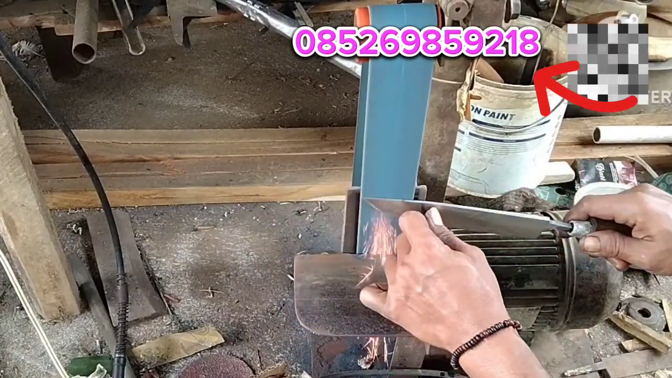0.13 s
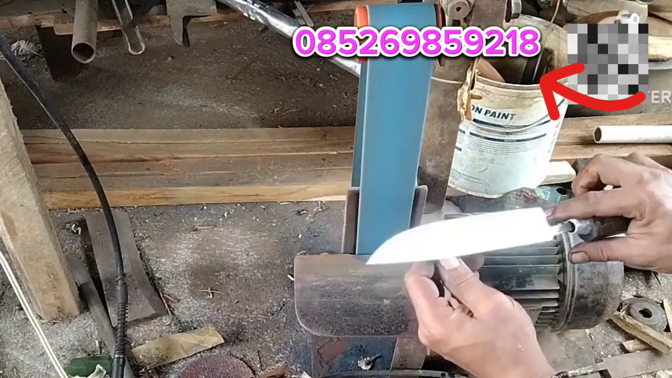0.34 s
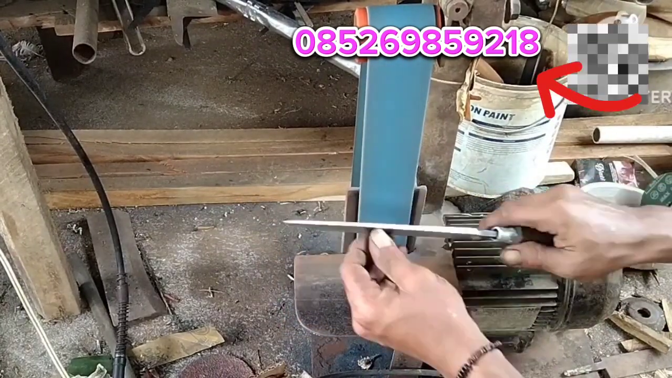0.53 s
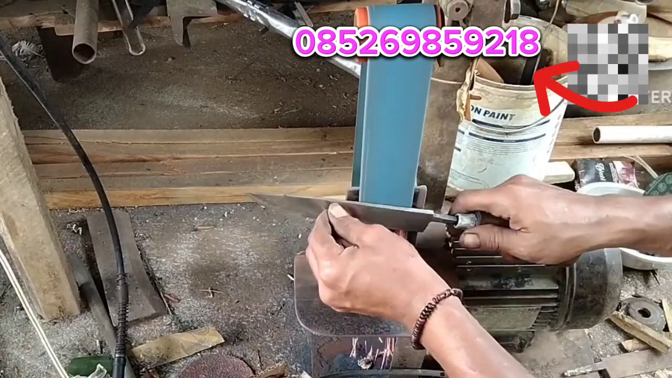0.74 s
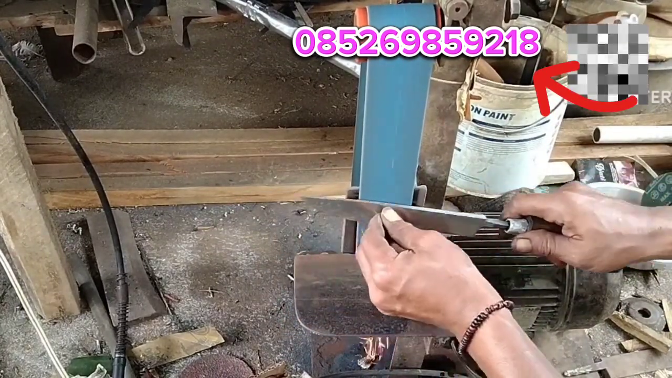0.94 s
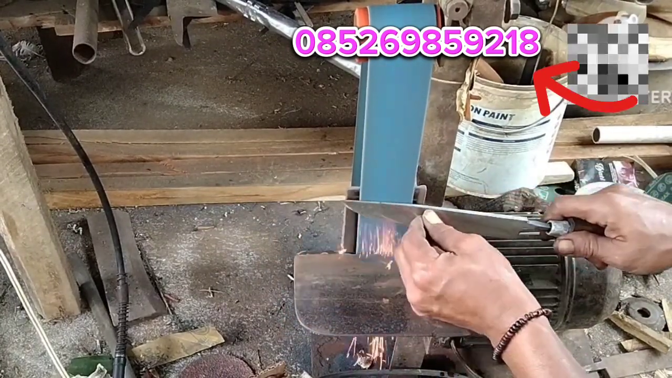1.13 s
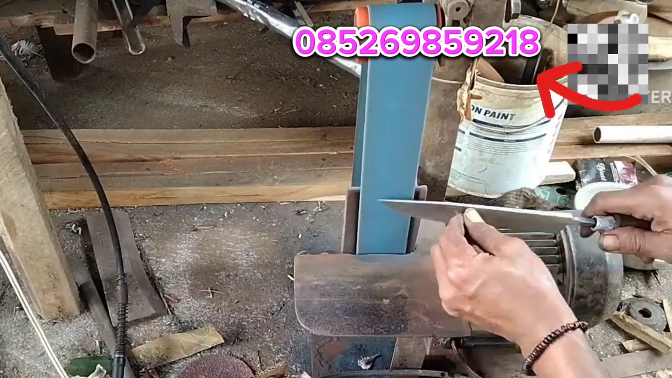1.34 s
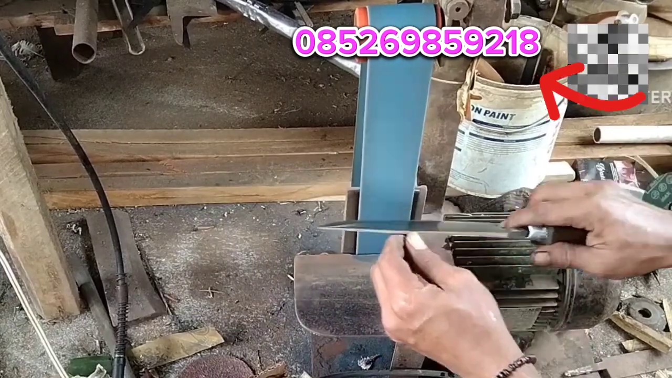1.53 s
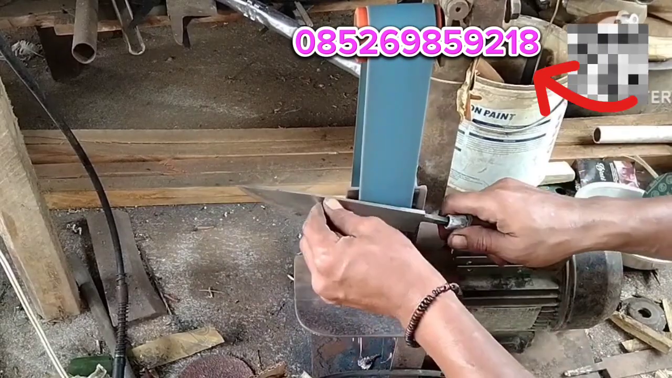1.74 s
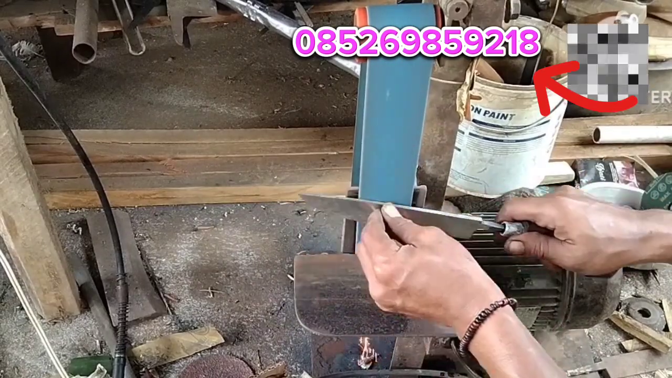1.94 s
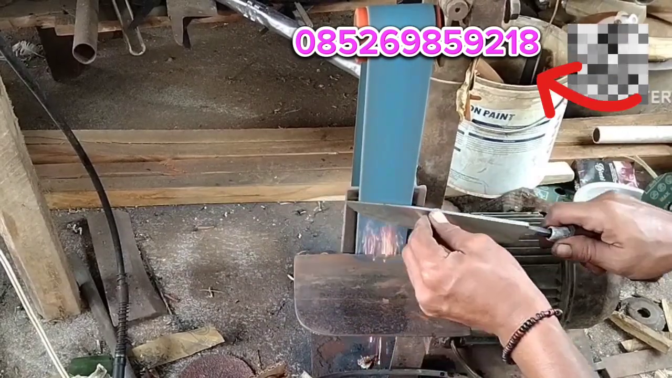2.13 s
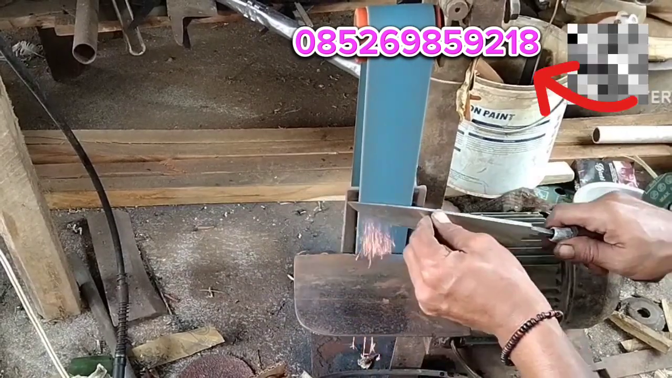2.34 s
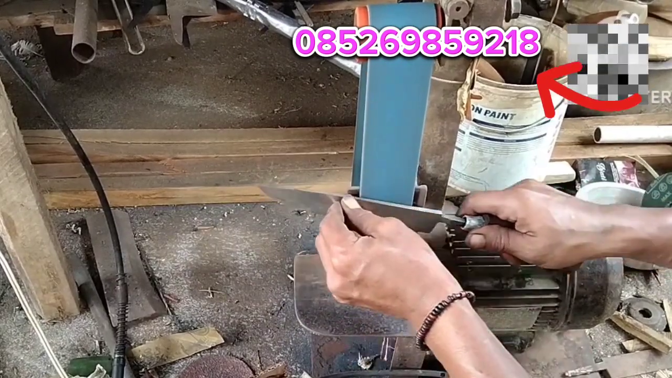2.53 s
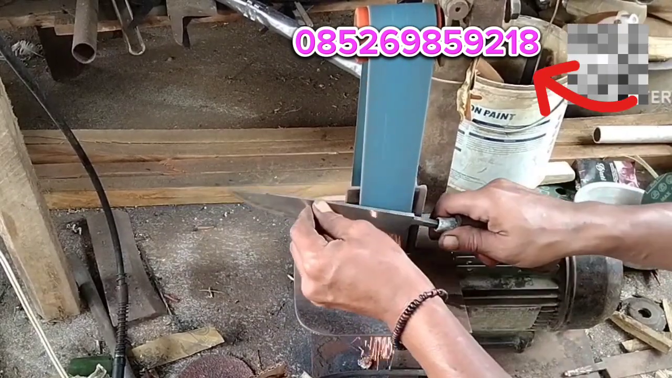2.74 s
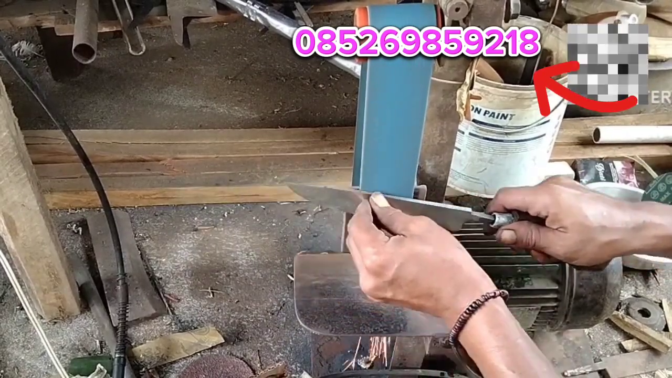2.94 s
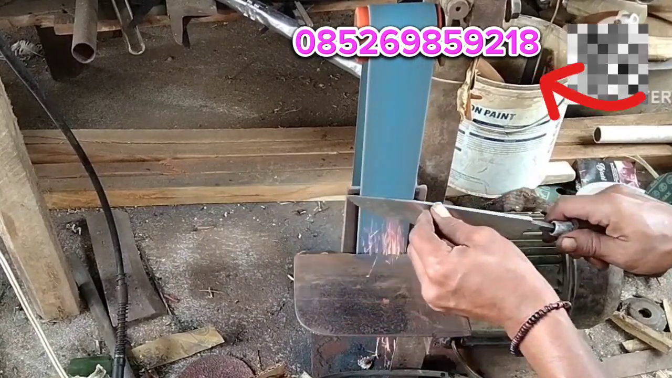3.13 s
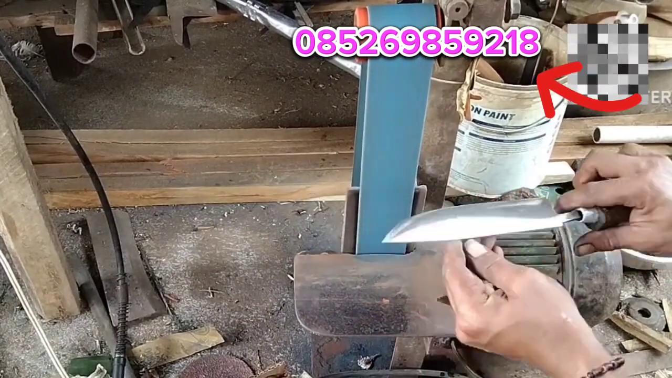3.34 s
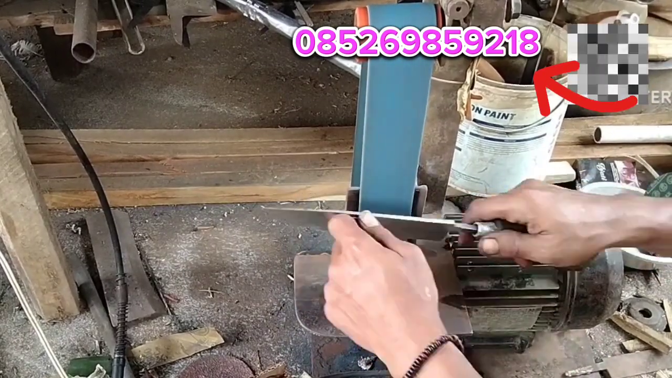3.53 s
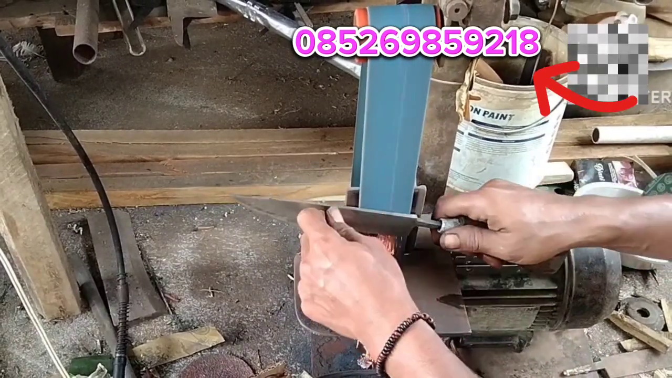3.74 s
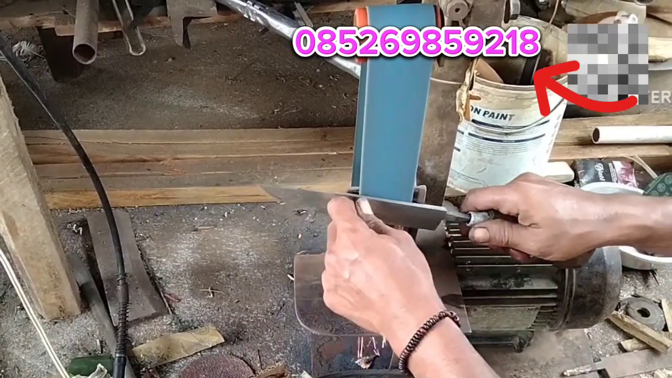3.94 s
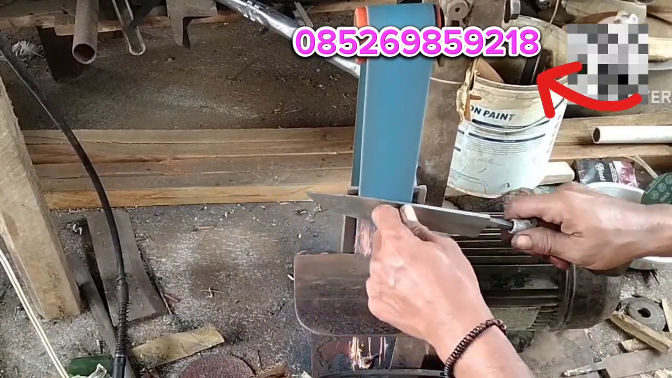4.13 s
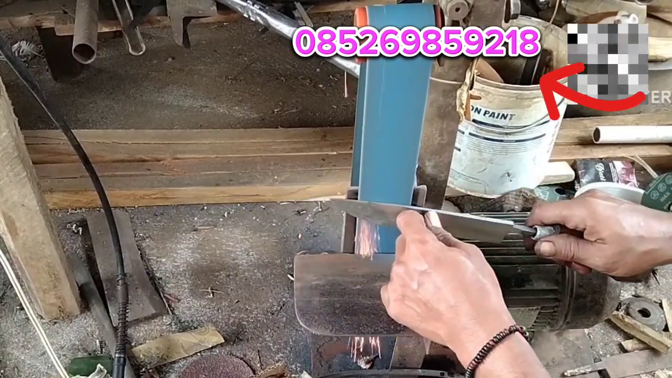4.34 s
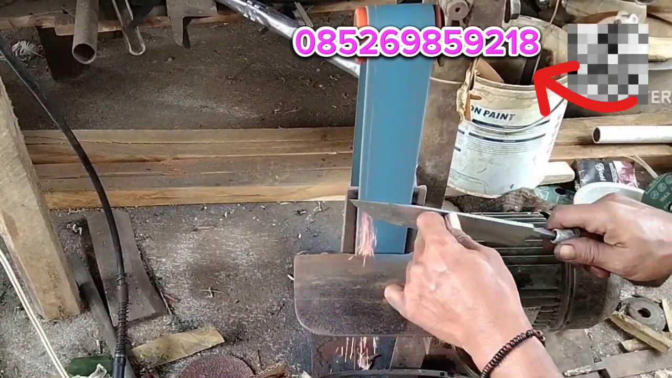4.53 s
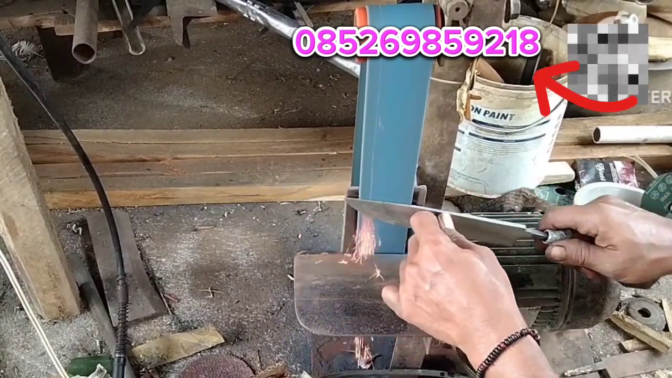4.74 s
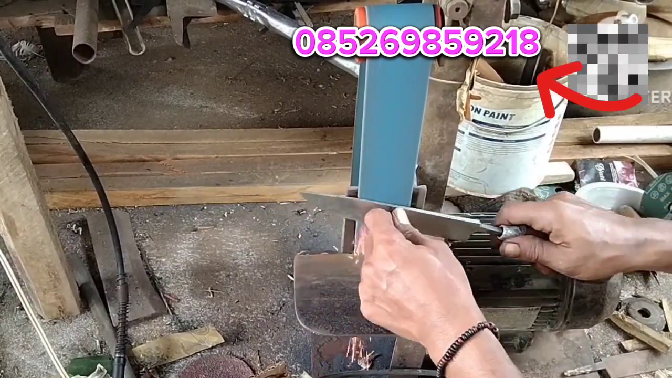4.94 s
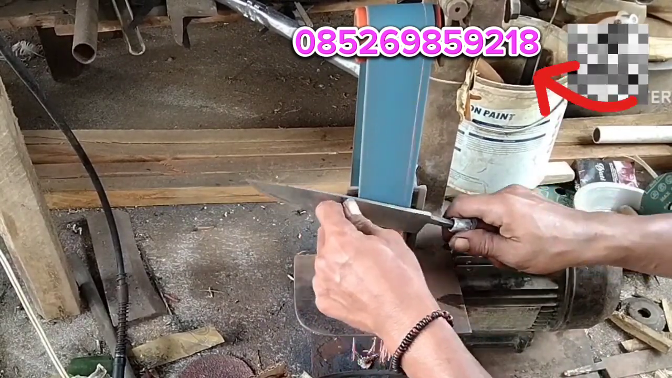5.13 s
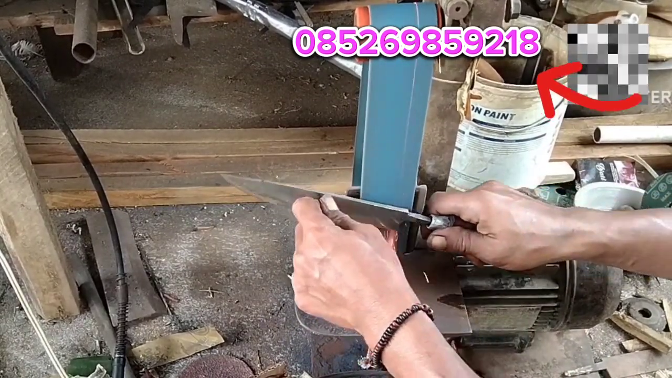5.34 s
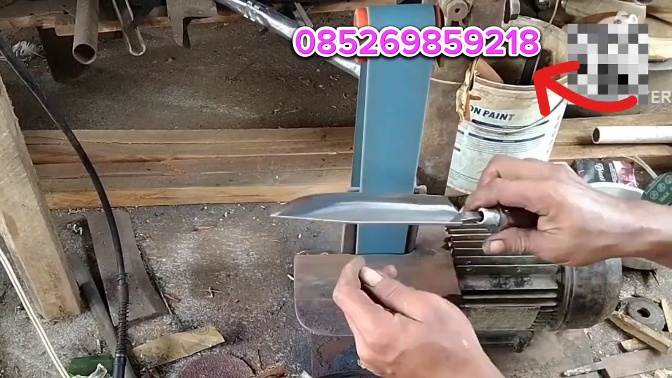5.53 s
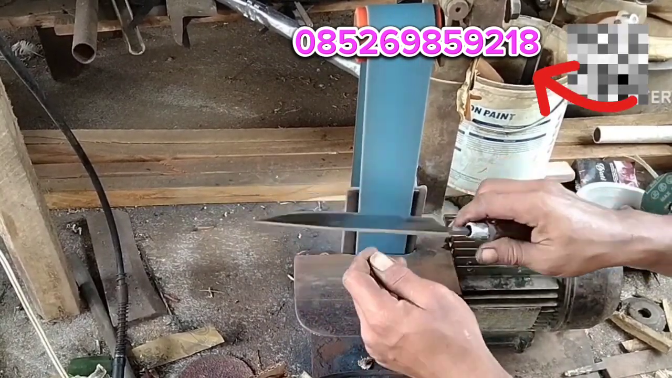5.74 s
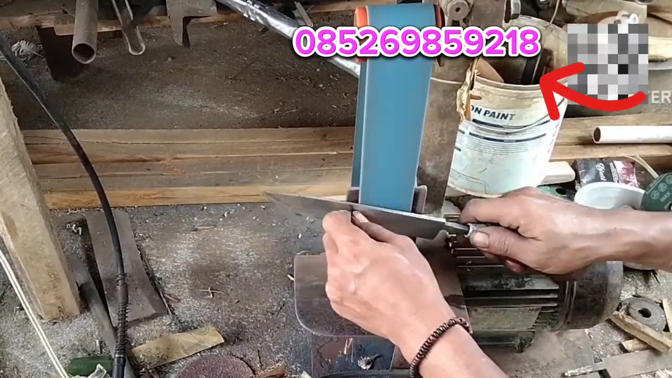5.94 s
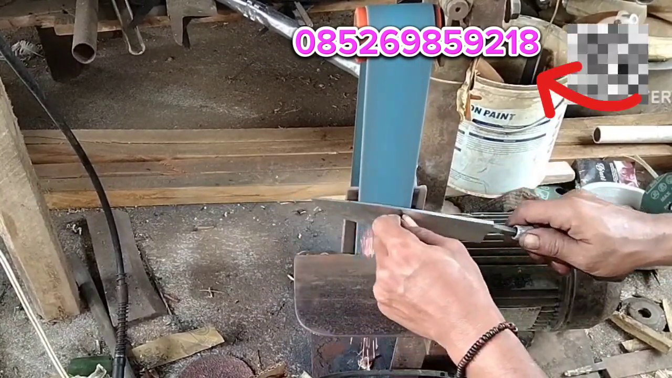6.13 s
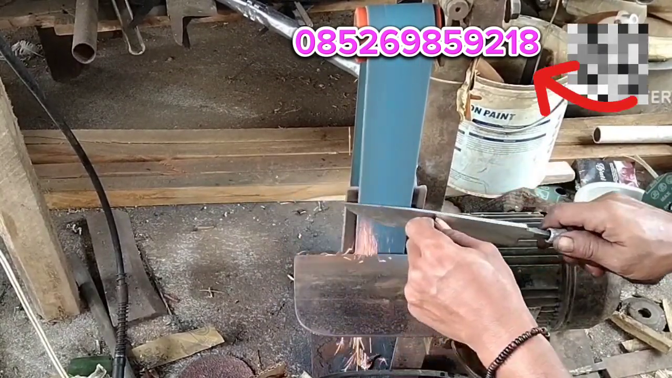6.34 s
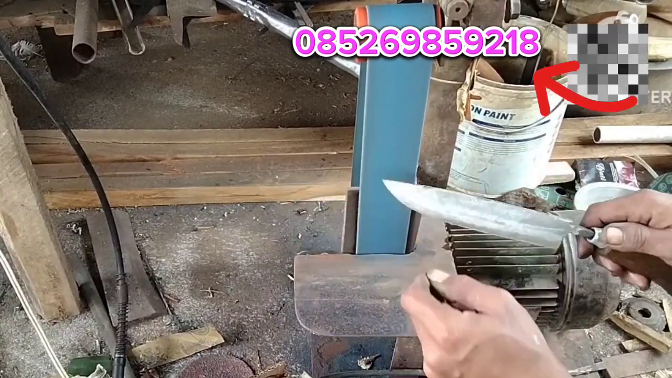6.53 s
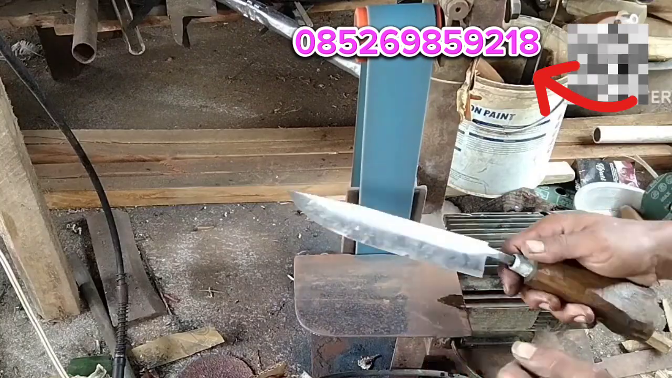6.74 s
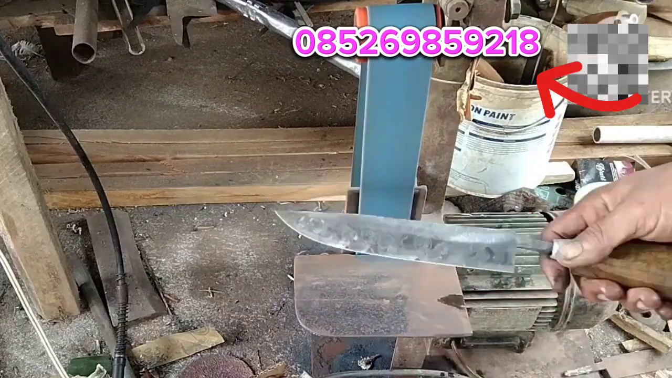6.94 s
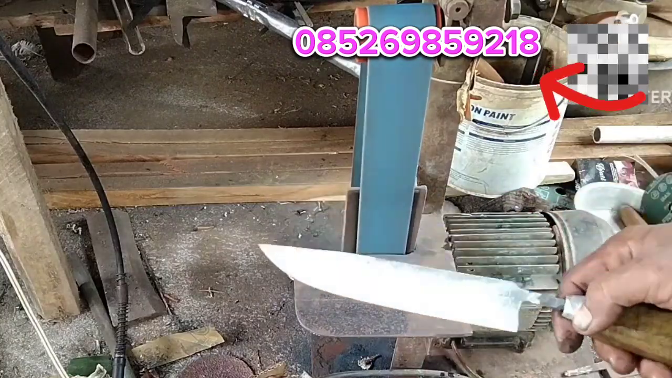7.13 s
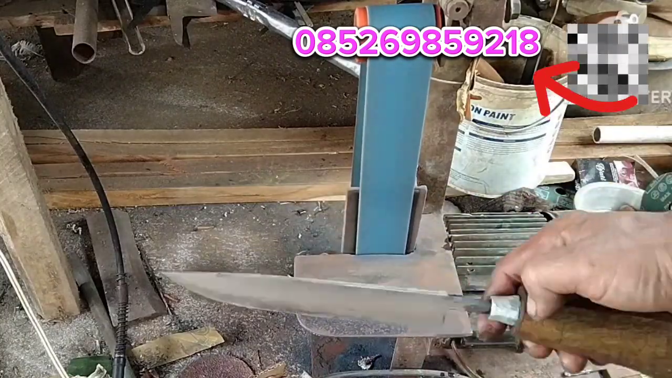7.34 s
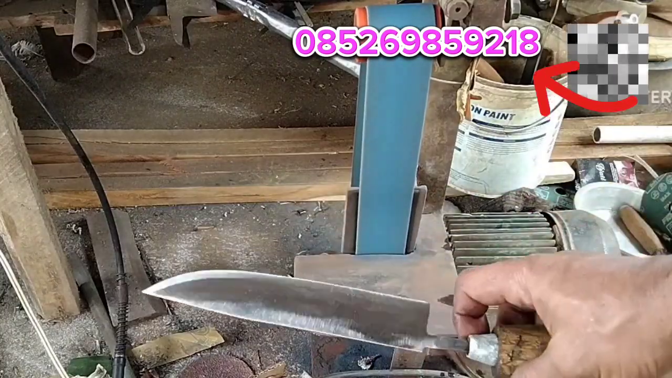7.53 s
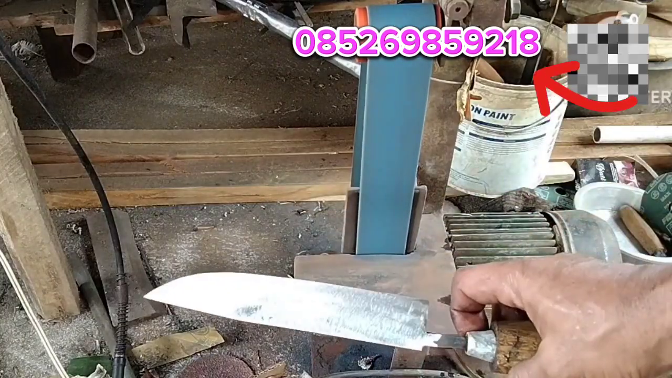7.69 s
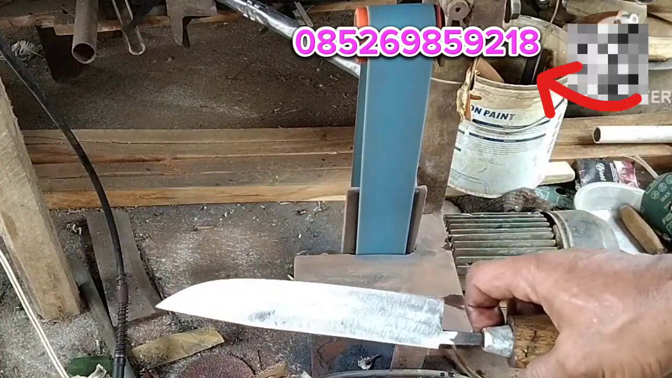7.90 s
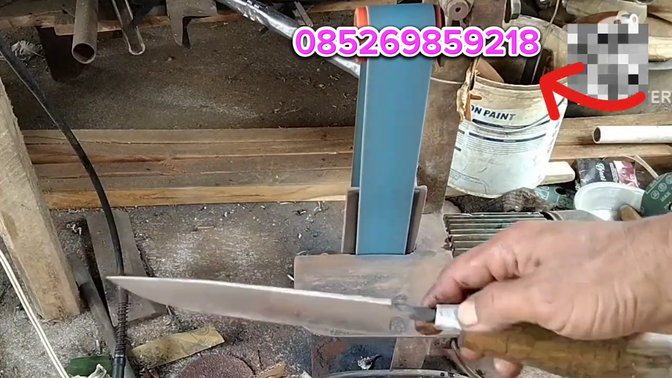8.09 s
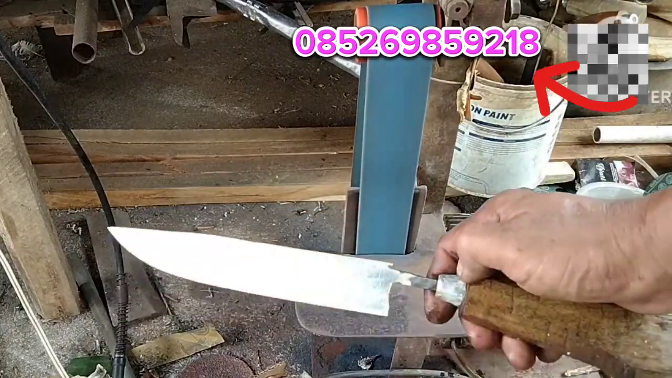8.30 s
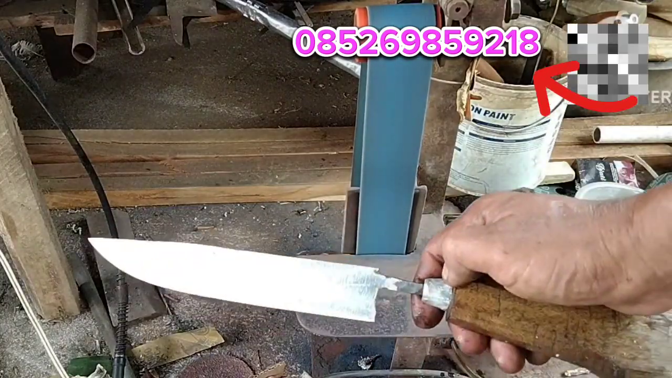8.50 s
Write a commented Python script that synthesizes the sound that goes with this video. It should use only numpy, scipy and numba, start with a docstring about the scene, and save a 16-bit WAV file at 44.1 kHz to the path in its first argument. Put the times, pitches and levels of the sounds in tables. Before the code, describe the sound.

Steel scrapes on a running abrasive belt with a high, sizzling hiss and a wavering metallic ring. The knife takes five passes, the third and fourth longest, with brief gaps and a few faint knocks. Underneath, the grinder's motor whines and buzzes, sagging a little under each pass, while the belt clatters. Then it runs on unloaded. A phone picks it up close in a small workshop, with little bass or echo.

```python
"""A bright, ringing hiss of steel on grit: a knife takes five strokes on a belt grinder in a small workshop.
The grit scrapes and sizzles along the edge and rings the blade, which knocks lightly on the rest.
Under it an induction motor whines and slows with each stroke, and a worn bearing buzzes.
The belt rattles over its wheels, and at the end the machine runs on idle.
All is heard close up through a phone that thins the bass and suppresses faint noise."""
import sys
import numpy as np
from scipy import signal
from scipy.fft import rfft, irfft
from scipy.io import wavfile
from scipy.ndimage import uniform_filter1d, map_coordinates
from numba import njit

SR = 44100
rng = np.random.default_rng(int(sys.argv[2]) if len(sys.argv) > 2 else 0)


def wrap_up_sound(samples):
    """Save the sound to the file named by the first command line argument, as 16-bit audio."""
    columns = np.atleast_2d(samples).T
    # keep every value between -1 and 1, then stretch to whole-number steps
    tamed = np.clip(columns, -1, 1)
    steps = np.round(tamed * 32767).astype(np.int16)
    wavfile.write(sys.argv[1], SR, steps)


N = 381906
TIME = np.arange(N) / SR
FREQ = np.maximum(np.fft.rfftfreq(N, 1 / SR), 1)
IDLE_HZ, BALLS_PER_TURN = 48.96, 3.04  # free shaft speed; bearing balls passing per turn


# The strokes of the knife. Each row: start, end, attack and belt recovery time in seconds,
# then base levels of scrape, sizzle and ring in dB.
STROKES = [(-.1, 0.23, 0.061, 0.0071, -38, -42, -45.5), (0.684, 1.385, 0.017, 0.043, -38, -39.5, -44.5),
           (1.719, 3.266, 0.053, 0.0029, -37.5, -42, -44.5),
           (3.635, 5.426, 0.051, 0.04, -38.5, -41.5, -42.5),
           (5.959, 6.535, 0.014, 0.043, -37.5, -40.5, -44.5)]

def strokes():
    """The blade meets the belt and stills it: contact (0-1), hold on the belt (0-1) and base levels."""
    contact = held = 0
    levels = []
    for start, end, attack, recover, *db in STROKES:
        contact += gate(start, end, attack, fall=0.039)
        held += gate(start, end + recover, rise=0.19, fall=0.022)
        levels += [(start, *db), (end, *db)]
    return contact, held, curves(levels)


# The blade's lowest ringing pitch, set by where the belt touches it; one curve a stroke.
# Each point: time in seconds, pitch in Hz.
RING_EDGE = [
    [(0, 3320), (.2, 3590)],
    [(.8, 3463), (.91, 3134), (1.09, 4200), (1.17, 3620), (1.24, 3680), (1.33, 4280)],
    [(1.75, 3212), (1.95, 3360), (2.05, 3920), (2.22, 3567), (2.34, 4070), (2.44, 3570), (2.51, 3070),
     (2.6, 3416), (2.9, 3373), (2.99, 2900), (3.12, 3928), (3.24, 3470)],
    [(3.72, 3348), (3.87, 3555), (4.05, 3054), (4.2, 3632), (4.38, 3251), (4.46, 3920), (4.77, 4200),
     (4.85, 3599), (4.95, 3784), (5.1, 3416), (5.22, 3590), (5.38, 3354)],
    [(5.98, 3520), (6.1, 3439), (6.3, 3666), (6.42, 4320), (6.49, 4460)],
]

def grinding(edge_hz, slip_hz, lull_db, scrape_db, sizzle_db, ring_db):
    """Grit cuts the steel: a firm touch rings; a light touch or a higher ring favours the sizzle."""
    press_hz = slip_hz - 1.04  # motor slip beyond that of a usual stroke
    octaves = np.log2(edge_hz / 3630)
    scrape_gain = undb(scrape_db - 4 * octaves + 0.81 * lull_db)
    sizzle_gain = undb(sizzle_db + 0.7 + 4 * octaves - np.maximum(press_hz, -0.6))
    ring_gain = undb(ring_db + 3 - 5 * octaves + 12 * np.minimum(press_hz, 0) + 10 * lull_db)
    chatter = undb(0.42 * walk(90) + walk(400))  # the edge chatters on the belt
    force = grit(spread_db=3) * chatter
    steel = scrape_gain * scrape(force) + sizzle_gain * sizzle(force, press_hz)
    steel += ring_gain * ring(edge_hz)
    return off_the_hands(steel, lag_s=0.000709, sway_s=0.00003, share=0.23)


# Tone of the cutting grit. Each row: frequency in Hz, relative level in dB.
SCRAPE_EQ = [(1000, -28), (2500, -21), (3100, -6), (4400, -33), (5200, -30), (5800, 2.5), (6550, -14.5),
             (7100, 5.5), (7450, 4.5), (7900, 3), (8700, 1.5), (9500, 4.5), (10200, -1.5), (11500, -13),
             (14000, -45)]
# The blade's thin high modes. Each row: pitch in Hz, width in Hz, relative level in dB.
HIGH_MODES = [(5560, 160, -3), (5820, 200, -2.5), (6860, 60, .5), (7410, 90, 1.5), (8320, 48, 1.5),
              (8530, 70, -6), (8810, 70, 2.5), (8970, 90, -4), (9180, 42, -4.5), (9580, 150, -4)]

def scrape(force):
    """Cutting noise plus the blade's high modes, which drift as the fingers shift their grip."""
    modes = unit(sum(undb(db + 3.2 * walk(7.6)) * resonate(grit(spread_db=5), hz, width)
                     for hz, width, db in HIGH_MODES))
    modes = varispeed(modes, 1 + 0.0015 * walk(2.95))
    return undb(-4.8) * colour(force, SCRAPE_EQ) + undb(-2.2) * modes


# Tone of the sizzle on top. Each row: frequency in Hz, relative level in dB.
SIZZLE_EQ = [(8500, -51), (10200, -6.5), (11000, 1), (11900, 5.5), (12700, 2), (13600, 0), (14600, 3.5),
             (16000, -10.5)]

def sizzle(force, press_hz):
    """The top of the cutting hiss, with a broad crest that rises in pitch with pressure."""
    hiss = colour(force, SIZZLE_EQ)
    crest = bandpass(hiss, hz=12100 + 360 * press_hz, damping=1000 / 12100)
    return unit(hiss + (undb(2.5) - 1) * crest)


# Tone of the blade's ring. Each row: frequency in Hz, relative level in dB.
RING_EQ = [(2600, -0.5), (3300, -6), (3650, 1.5), (3950, -4), (4220, -3), (4700, -0.5), (5150, 5.5),
           (5400, -4), (5650, -6), (6100, 2), (6600, -4), (8000, -36)]
# Bending modes that stand out of it. Each row: pitch in Hz, width in Hz, relative level in dB.
BENDING_MODES = [(3660, 300, -15), (4230, 190, -11.5), (5770, 330, -13.5)]

def ring(edge_hz):
    """Grit rings the blade; its bending modes glide a little with the place of contact."""
    steel = colour(grit(spread_db=4.5) * undb(0.72 * walk(80)), RING_EQ)
    bending = sum(undb(db + 3.2 * walk(4.3)) * resonate(grit(spread_db=1), hz, width, order=2)
                  for hz, width, db in BENDING_MODES)
    glide = (edge_hz / np.median(edge_hz)) ** 0.22
    steel += varispeed(bending, glide * (1 + 0.012 * walk(9)))
    for damping in (0.2, 0.55, 1.1, 1.7):  # belt and fingers hold the lower modes still
        steel = band_and_high(steel, 0.97 * edge_hz, damping)[1]
    return steel / np.sqrt(uniform_filter1d(steel ** 2, SR // 25))  # even out the level


# Flares of the blade. Each row: start and end in seconds, pitch and width in Hz, top level in dB.
FLARES = [(0.0, 0.213, 5550, 500, -40), (0.702, 0.883, 5740, 300, -40), (0.856, 1.0, 6000, 250, -47),
          (.87, 1.017, 6780, 160, -47), (0.718, 1.36, 8870, 140, -46), (1.094, 1.187, 5830, 200, -47),
          (1.726, 1.94, 5540, 420, -39.5), (1.76, 2.1, 12800, 700, -41), (1.89, 2.12, 4150, 220, -43.5),
          (2.44, 2.6, 8700, 700, -40), (2.582, 3.243, 3850, 700, -45.5), (2.7, 3.24, 8750, 180, -51),
          (2.884, 3.08, 6810, 140, -43), (2.942, 3.032, 2980, 200, -46), (3.722, 3.91, 8290, 150, -40),
          (4.267, 4.536, 12000, 1000, -37.5), (4.299, 4.493, 4180, 130, -40.5),
          (4.39, 4.808, 7500, 280, -40.5), (4.52, 4.85, 11800, 600, -43), (4.58, 4.76, 14500, 900, -41),
          (4.788, 4.84, 4200, 300, -40), (4.82, 5.2, 4020, 600, -47.5), (4.86, 5.204, 5670, 320, -43),
          (5.102, 5.43, 8980, 300, -39.5), (5.24, 5.417, 3430, 300, -43.5), (5.937, 6.14, 5600, 420, -39),
          (5.94, 6.143, 11600, 700, -43), (6.298, 6.4, 4140, 500, -39.5), (6.384, 6.49, 4530, 400, -55)]

def flares():
    """The sliding contact finds single modes of the blade and makes them swell and fade."""
    out = np.zeros(N)
    for start, end, hz, width, db in FLARES:
        fade = (end - start) / 3
        mode = resonate(grit(spread_db=1.5), hz, width, order=2)
        out += undb(db) * gate(start, end, fade, fade) * mode
    return out


# The main whine dragged down by the blade; one curve a stroke. Each point: time in seconds, pitch in Hz.
WHINE_PITCH = [
    [(0.0, 1140), (0.155, 1145), (0.19, 1152), (0.208, 1175)],
    [(0.66, 1175), (0.735, 1153), (0.755, 1141), (0.875, 1133), (1.115, 1132), (1.28, 1143), (1.39, 1175)],
    [(1.7, 1175), (1.795, 1145), (1.88, 1138), (2.18, 1137), (2.315, 1163), (2.38, 1148), (2.745, 1128),
     (2.855, 1110), (2.95, 1126), (3.18, 1128), (3.232, 1137), (3.258, 1175)],
    [(3.64, 1175), (3.68, 1157), (3.89, 1124), (4.06, 1142), (4.46, 1142), (4.645, 1154), (5.265, 1128),
     (5.325, 1118), (5.365, 1127), (5.395, 1148), (5.41, 1175), (5.42, 1175)],
    [(5.96, 1175), (6.015, 1148), (6.035, 1154), (6.17, 1138), (6.385, 1141), (6.53, 1175)],
]
WHINE_ORDER = 24  # an order is a multiple of the shaft speed

def motor_slip():
    """Hz by which the blade's pressure slows the shaft; none between strokes."""
    return sum(np.interp(TIME, s, IDLE_HZ - hz / WHINE_ORDER, left=0, right=0)
               for s, hz in map(np.transpose, WHINE_PITCH))


# The housing's response. Each row: shaft speed in Hz (this column is sorted on its own before use),
# then base levels of order 16, order 48 and the bearing buzz in dB.
HOUSING = [(45.4, -60, -62, -46), (47, -62, -58.5, -57.5), (47.26, -58.5, -86, -51.5),
           (47.62, -56, -64, -57), (47.5, -56, -74, -52.5), (47.97, -54, -55.5, -62),
           (48.3, -56.5, -56.5, -54), (48.84, -53.5, -48, -51.5)]
# The idle hum wavers as the knife is turned over.
# Each row: time in seconds, change of order 16 in dB, change of the buzz in dB.
IDLE_WAVER = [(6.6, 0.5, -9), (6.85, -2, 1), (6.98, 1.5, 3), (7.07, 4.5, -11.5), (7.4, 3.5, -8),
              (7.62, 3.5, -3), (7.82, 4.5, -17), (7.96, 4.5, -7), (8.26, 2.5, -9), (8.6, 0, -8)]

def housing(shaft_hz):
    """The housing rings louder at some speeds: dB of order 16, order 48 and buzz, with the idle waver."""
    speeds, *response = np.transpose(HOUSING)
    db16, db48, buzz_db = (np.interp(shaft_hz, np.sort(speeds), db) for db in response)
    fade_in = np.clip((TIME - IDLE_WAVER[0][0]) / 0.1 + 1, 0, 1)
    waver16, waver_buzz = curves(IDLE_WAVER)
    return db16 + fade_in * waver16, db48, buzz_db + fade_in * waver_buzz


# Fader ride of the main whine, in consecutive stretches. Each point: time in seconds, level in dB.
WHINE_LEVEL = [
    [(0, -43.5), (.13, -43), (.2, -51), (.45, -47.5), (.72, -47)],
    [(.79, -42.5), (.95, -45.5), (1.1, -42), (1.27, -47), (1.35, -56), (1.4, -71), (1.45, -49.5),
     (1.65, -45.5)],
    [(1.78, -48.5), (1.87, -43), (1.97, -47), (2.08, -41.5), (2.21, -40.5), (2.26, -48.5), (2.37, -53.5),
     (2.44, -43), (2.51, -49), (2.6, -40), (3.22, -40.5), (3.31, -60), (3.38, -47), (3.65, -47.5)],
    [(3.73, -57), (3.79, -40), (4.12, -43.5), (4.3, -42), (4.7, -56.5), (4.8, -52.5), (4.86, -42),
     (4.98, -40.5), (5.18, -44.5), (5.38, -42.5), (5.44, -68), (5.52, -50.5), (5.95, -47)],
    [(6.07, -56.5), (6.18, -42), (6.3, -42.5), (6.47, -54.5), (6.55, -67)],
    [(6.58, -59), (6.63, -50.5), (6.9, -42.5), (7.0, -48), (7.08, -54), (7.3, -47), (7.55, -47.5),
     (7.82, -53), (8.0, -45), (8.27, -52), (8.6, -46)],
]
# Weaker motor tones. Each row: order, level in dB relative to order 48.
OVERTONES = [(38, -21), (53, -17), (56, -14), (72, -23), (80, -11), (88, -15), (96, -9)]

def motor(turns, slip_hz, lull_db, lows_db, mids_db):
    """Magnetic whine on multiples of the shaft speed, joined by the bearing's buzz."""
    db16, db48, buzz_db = housing(IDLE_HZ - slip_hz)
    db16 += 1.4 * lows_db
    db48 += 1.6 * mids_db + 1.3 * lull_db
    buzz_db += 0.58 * lull_db + 0.42 * lows_db
    db40 = -63 + 3.5 * slip_hz + 8.1 * np.minimum(mids_db, 0) + 0.48 * lows_db
    whine = tone(turns, 24.016, joined_curve(WHINE_LEVEL), waver_db=0.75)
    whine += tone(turns, 40, db40, waver_db=1.8) + tone(turns, 48, db48, waver_db=1.5)
    whine += sum(tone(turns, order, db48 + db) for order, db in OVERTONES)
    hum = tone(turns, 16, db16, waver_db=1)
    hum += tone(turns, 11, db16 - 23.5) + tone(turns, 8, db16 / 2 - 49)
    return whine + hum + bearing(turns, db48, buzz_db)


# Bearing sidebands. Each row: motor order, offset in ball rates, level in dB relative to order 48.
SIDEBANDS = [(48, -2, -20.5), (48, -1, -7.5), (48, 1, -14), (48, 2, -10.5), (96, -2, -14), (96, -1, -8)]

def bearing(turns, db48, buzz_db):
    """The worn bearing adds sidebands to the whine and a rasp that pulses at its ball rate."""
    buzz = sum(tone(turns, order + balls * BALLS_PER_TURN, db48 + db) for order, balls, db in SIDEBANDS)
    # the end shield rings just above the main whine and lifts the sidebands there
    buzz += tone(turns, WHINE_ORDER + BALLS_PER_TURN, buzz_db - 3, waver_db=0)
    buzz += tone(turns, WHINE_ORDER + 2 * BALLS_PER_TURN, buzz_db - 11.5)
    pulses = rng.standard_normal(N) * ball_beats(turns, depth=0.47)
    return buzz + undb(buzz_db - 3.5) * resonate(pulses, hz=1300, width=580, order=2)


def ball_beats(turns, depth):
    """A swell each time a ball rolls over the worn spot."""
    return 1 + depth * np.cos(2 * np.pi * BALLS_PER_TURN * turns)


# Moments when the machine sings under load. Each row: start and end in seconds, level in dB.
SINGS = [(-.1, 0.204, -48.5), (0.745, 0.829, -48), (1.784, 1.955, -48), (2.126, 2.28, -50),
         (2.418, 2.486, -46.5), (2.623, 2.904, -47.5), (3.747, 4.02, -49), (4.31, 4.412, -54),
         (4.797, 5.004, -58), (5.253, 5.306, -52), (5.366, 5.413, -45), (6.133, 6.41, -53)]

def singing(turns):
    """A hoarse tone: order 32 of the motor and a resonance beside it, rubbed by the grit."""
    swell = sum(undb(db) * gate(start, end, rise=0.019, fall=0.019) for start, end, db in SINGS)
    rasp = undb(-6.5) * resonate(grit(spread_db=5), hz=1500, width=480, order=2)
    return swell * (np.sin(2 * np.pi * 32 * turns) + rasp)


# Tone of the belt's low rush. Each row: frequency in Hz, relative level in dB.
RUSH_EQ = [(30, 7), (80, -17), (120, -26), (190, -12.5), (290, -4), (460, -8), (600, 4.5), (900, 7),
           (1150, 8), (1500, -44), (1900, -38)]
# Resonances jangled by the flapping belt. Each row: pitch in Hz, width in Hz.
JANGLES = [(3200, 350), (3600, 350), (4050, 380), (5550, 550)]
WHEEL_LAGS_S = (0.0204, 0.0536)  # travel between wheels at idle speed

def belt(turns, held, lows_db, mids_db):
    """The same bumps strike one wheel after another, so the belt's noise repeats as it travels."""
    bumps = grit(spread_db=1.5)
    for lag in WHEEL_LAGS_S:
        step = int(lag * SR)
        bumps = bumps + 0.5 * np.roll(bumps, step) + 0.022 * np.roll(bumps, 2 * step)
    bumps = bumps[(turns / IDLE_HZ * SR).astype(int) % N]  # the belt slows with the shaft
    rush = undb(-58.5 - 2.5 * held + 0.57 * lows_db) * colour(bumps, RUSH_EQ)
    flap_db = 0.75 * (walk(25) + walk(110) / 2)  # flapping shakes the treble most
    treble = rattle(bumps, turns, held, mids_db, flap_db) + belt_hiss(held, flap_db)
    treble += sum(bell(treble, hz, width, 3.2 * (walk(40) - 0.5)) for hz, width in JANGLES)
    return rush + off_the_hands(treble, lag_s=0.000898, sway_s=0.00002, share=0.39)


# Tone of the rattle. Each row: frequency in Hz, relative level in dB.
RATTLE_EQ = [(1000, -39), (1600, -9.5), (1900, 3.5), (2300, 3), (2700, 9), (3050, -1.5), (3500, 5),
             (3750, 9), (4200, 5.5), (4550, 12.5), (5100, -6), (5600, 3), (6500, 6), (7600, -28)]
# Two bands of the rattle that rise and fall. Each row: centre in Hz, width in Hz.
RATTLE_BELLS = [(3400, 1100), (4150, 320)]
# Their fader rides. Each row: time in seconds, gain of the lower and of the upper band in dB.
RATTLE_RIDES = [(0, 0.5, 0), (3.5, -1, 2), (5.5, -4.5, -5), (6.95, -1, 1), (7.1, -15, 4.5), (7.4, -1, 0),
                (7.7, -5, -4), (8.2, -6.5, -2), (8.6, 3, 5)]

def rattle(bumps, turns, held, mids_db, flap_db):
    """The belt clatters over its wheels, more softly while the blade holds it."""
    beating = bumps * ball_beats(turns, depth=0.23)
    clatter = undb(-42 - 4.5 * held + mids_db) * colour(beating, RATTLE_EQ)
    clatter += (undb(flap_db) - 1) * bandpass(clatter, hz=3200, damping=3.7)
    whirr = bandpass(clatter, hz=2490, damping=0.092)
    clatter -= 0.93 * held * whirr  # the blade stills the span's whirr
    for (hz, width), db in zip(RATTLE_BELLS, curves(RATTLE_RIDES)):
        clatter += bell(clatter, hz, width, db)
    return clatter


# Tone of the belt's hiss. Each row: frequency in Hz, relative level in dB.
HISS_EQ = [(3000, -16.5), (4500, 12.5), (6500, 7), (7600, 7), (8600, 2.5), (9400, 5), (10300, 1.5),
           (11500, 7), (12600, 7.5), (13600, -6), (14800, 3), (16000, -2.5)]
# Resonances around the belt. Each row: pitch in Hz, width in Hz, boost in dB.
HISS_PEAKS = [(6560, 250, 0), (8540, 230, 4), (9450, 310, 5), (10700, 400, 2.5), (12650, 770, 4),
              (14700, 400, 5.5)]
# Fader ride of the hiss. Each row: time in seconds, base level in dB.
HISS_LEVEL = [(0, -42), (3.6, -42), (5.6, -43), (6.9, -45.5), (7.9, -46.5), (8.4, -50)]

def belt_hiss(held, flap_db):
    """The running grit hisses through the resonances around the belt; the blade's touch damps it."""
    hiss = colour(grit(spread_db=4), HISS_EQ)
    hiss += sum(bell(hiss, hz, width, db) for hz, width, db in HISS_PEAKS)
    free_db = curves(HISS_LEVEL)[0] + 1.5
    return undb(free_db - 5 * held + flap_db) * unit(hiss)


# Blade against rest. Each row: start in seconds, unfiltered level in dB, pitch in Hz, T60 in seconds.
KNOCKS = [(.622, -46, 474, 0.04), (0.625, -39, 601, 0.018), (3.6745, -24.5, 513, 0.0039),
          (3.679, -48, 260, .03), (3.684, -49, 700, .012), (3.69, -40, 400, .012), (6.482, -30, 4180, .03),
          (6.962, -36, 3100, .03), (6.966, -33, 3450, .025)]

def knocks():
    """Short damped rings where the blade touches the rest."""
    out = np.zeros(N)
    for start, db, hz, t60 in KNOCKS:
        age = np.maximum(TIME - start, 0)
        out += undb(db - 60 * age / t60) * (age > 0) * np.cos(2 * np.pi * hz * age)
    return uniform_filter1d(low_cut(out, hz=150), size=6)  # the soft contact rounds the attack


# Dips and swells. Each row: start, end and return time in seconds, base change of lows and mids in dB.
DIPS = [(0.778, 1.234, 0.046, -5, -10), (0.843, 1.186, 0.083, -5.5, 1.5), (1.867, 2.163, 0.11, -1.5, -6.5),
        (2.47, 2.602, .066, -3, -7), (2.608, 2.997, 0.074, -3.5, 1), (2.976, 3.128, 0.071, -0.5, -3),
        (3.723, 3.98, .066, -3.5, 0), (3.951, 4.361, .066, -0.5, 2.5), (4.45, 4.9, 0.059, -1.5, -0.4),
        (4.865, 5.183, 0.1, -2, -4), (5.028, 5.417, 0.02, -12, -3), (6.055, 6.582, .018, -12, -0.5),
        (6.05, 6.237, .066, 3, -1), (6.282, 6.55, .02, -2, -2), (6.864, 6.987, .066, 2.5, -3),
        (8.27, 8.8, .066, 2.5, 0.64)]

def dips():
    """The lows and mids drop or swell briefly: two dB curves that each layer scales to its own depth."""
    return sum(np.outer(db, gate(start, end, rise=0.055, fall=back)) for start, end, back, *db in DIPS)


# Lulls. Each row: centre and half length in seconds, base change in dB of motor and of belt and blade.
LULLS = [(0.26, 0.058, -2, -1.5), (1.351, 0.055, -11.5, -3.5), (3.696, 0.02, -17, -11),
         (4.673, 0.11, -0.5, -1.5), (5.393, 0.083, -5, -2), (6.506, 0.048, -10.5, -2.5)]

def lulls():
    """The sound sinks as the contact changes: two dB curves that each layer scales to its own depth."""
    return sum(np.outer(db, np.exp(-((TIME - centre) / half) ** 2)) for centre, half, *db in LULLS)


# Patches of hiss that flicker quickly. Each row: centre in Hz, width in Hz.
PATCHES = [(2700, 360), (3400, 1500), (4200, 260), (5300, 2000), (6500, 630), (8200, 1200), (10500, 1000)]
# Narrow treble bands that swish slowly. Each row: centre in Hz, width in Hz.
SWISHES = [(6400, 300), (7300, 400), (7900, 400), (8600, 450), (9400, 450), (10300, 600), (11300, 600),
           (12000, 500), (12700, 550), (13700, 700), (14700, 700)]

def shimmer(x):
    """Parts of the hiss swell and thin by chance, each by itself."""
    x = x + sum(bell(x, hz, width, 1.5 * walk(15)) for hz, width in PATCHES)
    for hz, width in SWISHES:
        x += bell(x, hz, width, 2.2 * (walk(3.5) - 0.24))
    return x


def hollows(x, edge_hz, contact):
    """While the blade bears on the belt, the sound hollows below its ring and above its first modes."""
    below_hz = 0.881 * edge_hz * (1 + 0.039 * walk(36))
    above_hz = 5120 * (edge_hz / 3500) ** 0.14 * (1 + 0.039 * walk(5.3))
    x = x - contact * bandpass(x, below_hz, damping=0.15)
    return x - contact * bandpass(x, above_hz, damping=0.092)


def off_the_hands(x, lag_s, sway_s, share):
    """A close reflection whose path wavers as the hands move, so its peaks and hollows wander."""
    delay_s = lag_s + sway_s * (walk(1.3) + walk(13) / 2)
    echo = map_coordinates(x, [(TIME - delay_s) * SR], mode="nearest")
    return (x + share * echo) / np.sqrt(1 + share ** 2)


def workshop(x, wet_db, t60):
    """Bench, floor and walls add a short scatter of echoes; hands, dust and rough wood dull them."""
    age = TIME[:SR // 3]
    tail = rng.standard_normal(len(age)) * undb(-60 * age / t60) * (age > 0.002)
    echoes = signal.fftconvolve(x, tail / np.linalg.norm(tail))[:N]
    return (x + undb(wet_db) * high_cut(echoes, hz=5500)) / np.sqrt(1 + undb(2 * wet_db))


# Threshold of the noise suppressor. Each row: frequency in Hz, noise density in dB per Hz.
SUPPRESS_BELOW = [(100, -122), (400, -108), (1000, -102), (1500, -93.5), (2300, -93), (3100, -90),
                  (3800, -91.5), (5200, -90), (7500, -96), (10000, -98), (15000, -100)]

def suppress(x, floor_db=-16, steepness=2.2, frame=1024):
    """The phone turns down each band while it is weak: valleys deepen and faint hiss flutters."""
    framing = dict(fs=SR, nperseg=frame, noverlap=frame * 3 // 4)
    hz, _, spectra = signal.stft(x, **framing)
    power = uniform_filter1d(np.abs(spectra) ** 2, size=7, axis=-2)  # smooth across frequency
    power = uniform_filter1d(power, size=3, axis=-1)  # and across time
    density = np.maximum(power, 1e-20) * frame / (1.5 * SR)
    threshold = eq_gain(hz + 1, SUPPRESS_BELOW)[:, None] ** 2
    opening = 1 / (1 + (threshold / density) ** steepness)
    gain = undb(floor_db) + (1 - undb(floor_db)) * opening
    return signal.istft(spectra * gain, **framing)[1][..., :N]


def grit(spread_db):
    """Dense impacts of abrasive grains of uneven size."""
    return unit(rng.standard_normal(N) * undb(spread_db * rng.standard_normal(N)))


def tone(turns, order, db, waver_db=2.2):
    """A sine locked to the shaft, wavering around an rms level."""
    peak = np.sqrt(2) * undb(db + waver_db * walk(21.5))
    return peak * np.sin(2 * np.pi * (order * turns + rng.random()))


def undb(db):
    """Decibels to gain."""
    return 10 ** (np.asarray(db) / 20)


def unit(x):
    """Scale to rms 1."""
    return x / np.sqrt(np.mean(x ** 2))


def curves(rows):
    """Each column after the time as a value per sample."""
    times, *columns = np.transpose(rows)
    return [np.interp(TIME, times, column) for column in columns]


def joined_curve(stretches):
    """One curve through consecutive stretches of (time, value) points."""
    return curves([point for stretch in stretches for point in stretch])[0]


def gate(start, end, rise, fall):
    """From 0 up to 1 after the start, and back to 0 by the end; all in seconds."""
    return np.clip(np.minimum((TIME - start) / rise, (end - TIME) / fall), 0, 1)


def walk(rate):
    """Smooth chance with spread 1, changing about rate times a second."""
    return unit(high_cut(rng.standard_normal(N), rate))


def varispeed(x, speed):
    """Bend the pitch by running a sound at a changing speed."""
    return map_coordinates(x, [np.cumsum(speed)], mode="mirror")


def high_cut(x, hz):
    """Roll off the highs at 24 dB an octave."""
    return irfft(rfft(x) / (1 + (FREQ / hz) ** 4), N)


def low_cut(x, hz):
    """Roll off the lows at 12 dB an octave."""
    return signal.sosfilt(signal.butter(2, hz, "highpass", fs=SR, output="sos"), x)


def eq_gain(hz, points):
    """Gain along a curve of (Hz, dB) points."""
    points_hz, db = np.transpose(points)
    return undb(np.interp(np.log(hz), np.log(points_hz), db))


def colour(x, points):
    """Shape a sound by (Hz, dB) points; rms 1."""
    return unit(irfft(rfft(x) * eq_gain(FREQ, points), N))


def resonate(x, hz, width, order=1):
    """Ring a resonance, steeper with each order; rms 1."""
    detuning = (FREQ / hz - hz / FREQ) * hz / width
    return unit(irfft(rfft(x) / (1 + 1j * detuning) ** order, N))


def bell(x, hz, width, db):
    """What to add to a sound to lift or cut one band by db."""
    return (undb(db) - 1) * bandpass(x, hz, width / hz)


def bandpass(x, hz, damping):
    """One band with a steady or moving centre; damping is width over centre."""
    return band_and_high(x, hz * np.ones(N), damping)[0]


@njit
def band_and_high(x, hz, damping):
    """State-variable filter whose centre moves every sample: band-pass and high-pass outputs."""
    y, band, low = np.empty((2, len(x))), 0., 0.
    for i in range(len(x)):
        g = np.tan(np.pi * hz[i] / SR)
        v = (band + g * (x[i] - low)) / (1 + g * (g + damping))
        y[0, i] = damping * v
        y[1, i] = x[i] - damping * v - low - g * v
        band, low = 2 * v - band, low + 2 * g * v
    return y


def scene():
    """One shaft drives whine and belt, and each stroke of the blade loads it; the mix is mono."""
    contact, held, stroke_db = strokes()
    lows_db, mids_db = dips()
    motor_lull_db, lull_db = lulls()
    edge_hz = joined_curve(RING_EDGE)
    slip_hz = motor_slip()
    shaft_hz = (IDLE_HZ - slip_hz) * (1 + 0.00033 * walk(22))
    turns = np.cumsum(shaft_hz) / SR
    blade = contact * (grinding(edge_hz, slip_hz, lull_db, *stroke_db) + flares())
    running_belt = undb(lull_db) * belt(turns, held, lows_db, mids_db)
    noise = workshop(shimmer(blade + running_belt) + knocks(), wet_db=-8, t60=0.06)
    noise = hollows(noise, edge_hz, contact)
    sound = noise + motor(turns, slip_hz, motor_lull_db, lows_db, mids_db) + singing(turns)
    return np.array([sound, sound])


def record(dry):
    """The phone thins the bass, suppresses faint noise and cuts the top steeply."""
    top_cut = signal.ellip(12, 0.1, 80, 15500, fs=SR, output="sos")
    return signal.sosfilt(top_cut, suppress(low_cut(dry, hz=150)))


dry = scene()
out = record(dry)
wrap_up_sound(out)
```